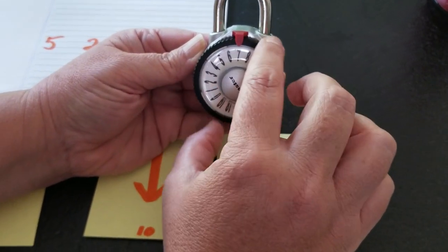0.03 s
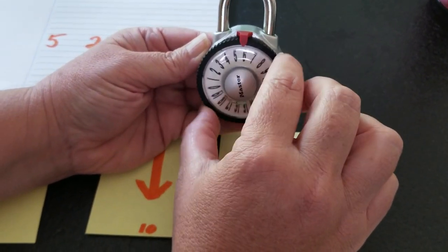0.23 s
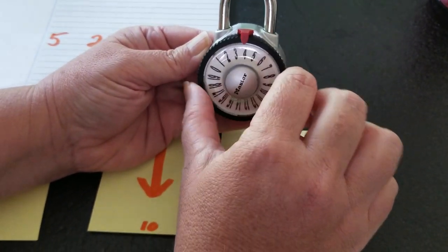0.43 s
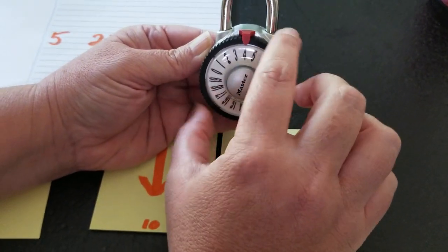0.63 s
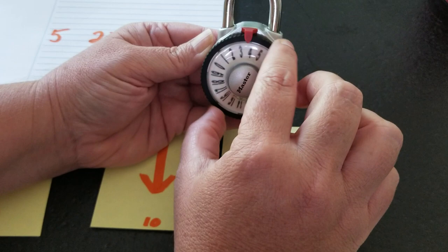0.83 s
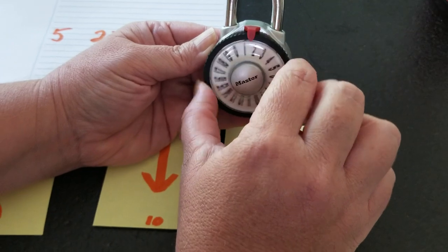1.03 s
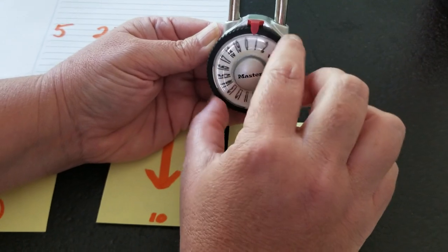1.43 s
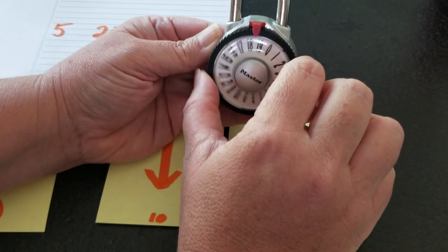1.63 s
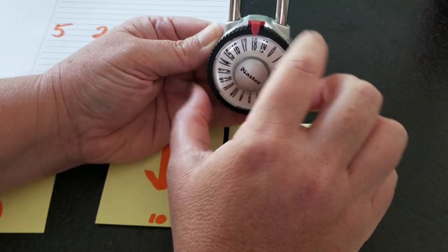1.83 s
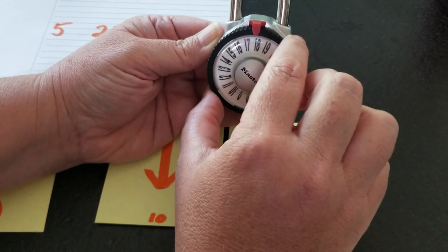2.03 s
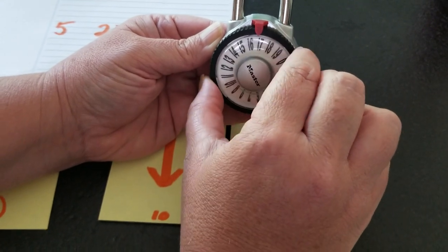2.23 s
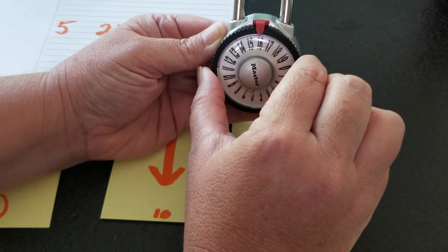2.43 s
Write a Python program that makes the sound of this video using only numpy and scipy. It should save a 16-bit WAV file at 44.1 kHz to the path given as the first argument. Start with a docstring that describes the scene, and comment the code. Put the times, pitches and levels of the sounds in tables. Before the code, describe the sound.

A combination padlock dial clicks close up as a hand turns it. Three sharp metallic clicks fall between 0.2 and 0.45 seconds, then a fingertip slides faintly around 0.7. Three more clicks come from 0.9 to 1.1, followed by faint high rubs near 1.4 and three softer clicks from 1.5 to 1.7. One light click lands at 2.1. Low ventilation hums throughout in the small room.

```python
"""A small live room, with a low ventilation rumble and hum. Close up, a hand turns the dial of a
combination padlock in short pushes. Each click is a few milliseconds of metal parts knocking together
and ringing the case: a faint, very short hiss swells into it, the wheels settle with a duller rebound,
and the room answers. A fingertip slides over the dial for a new grip; later come two faint, high rubs."""
import sys
import numpy as np
from scipy import signal
from scipy.fft import rfft, irfft, next_fast_len
from scipy.io import wavfile
from scipy.ndimage import map_coordinates

SR = 44100
rng = np.random.default_rng(int(sys.argv[2]) if len(sys.argv) > 2 else 0)


def bounce(signal):
    """Save signal as a 16-bit WAV file at the path given by the first command-line argument."""
    frames = np.transpose(np.atleast_2d(signal))
    limited = np.clip(frames, -1, 1)
    pcm = np.round(limited * 32767).astype(np.int16)
    wavfile.write(sys.argv[1], SR, pcm)


N = 110250

# Tone of the ventilation. Each row: frequency in Hz, relative level in dB.
AIR_TONE = [(28, -7.5), (42, 3), (90, -2.5), (150, 2), (200, -1), (260, -5), (320, -5.5), (400, -11.5),
            (600, -12.5), (900, -21.5), (1200, -18.5), (1600, -28.5), (2200, -25.5), (3800, -31.5),
            (5000, -29.5), (9000, -32.5), (15500, -30)]
# Where the air sits. Each row: frequency in Hz, left over right in dB.
AIR_PAN = [(30, 1.8), (120, 2.5), (300, 7.2), (700, 0.33), (8000, 0.33)]
# Narrow bass, wide hiss. Each row: frequency in Hz, left-right correlation.
AIR_CORRELATION = [(30, 0.81), (250, 0.93), (600, 0.37), (1500, 0.1), (8000, 0.033)]
# Level ride on the air. Each row: time in seconds, gain in dB.
AIR_SWELL = [(0, 0.5), (.4, 3), (.8, 4.5), (1.3, 2), (1.7, 3.65), (2.1, 2.5), (2.5, 2)]
# The two hum lines. Each row: frequency in Hz, level in dB before ride and pan.
HUM_LINES = [(119, -69), (317, -71)]
# Level ride on the upper line. Each row: time in seconds, gain in dB.
UPPER_HUM_SWELL = [(0, -12), (.25, -2.5), (.58, -13), (.73, 4.5), (1.03, 6), (1.15, -11), (1.8, -4.5),
                   (2.12, 6.5), (2.22, -9), (2.5, 4)]
# The dial's clicks, plus two faint, high rubs near 1.4 s. Each row: start in seconds, level in dB,
# length in seconds, treble tilt in dB per octave, left over right in dB, relative rebound level in dB.
DIAL_CUES = [(.2255, -20, 0.0014, -1.5, 1.5, -11), (0.3516, -19, .0032, -0.5, 0.5, -21.5),
             (0.4383, -16.5, .0034, -2, -0.5, -25), (0.538, -44.5, 0.0036, -3, 8.5, -49),
             (.7600, -46.5, 0.00087, -3.5, 3.5, -42.5), (0.775, -53, .004, -2, -3.5, -46),
             (0.8869, -18, .0026, -.5, 0.5, -19), (0.976, -20.5, 0.0031, 1, .5, -23.5),
             (1.079, -26, 0.0039, 1.5, 0, -27), (1.386, -65, 0.013, 2, 1, -40),
             (1.425, -60.5, .022, 2, 0, -40), (1.4958, -28, .0048, 1, 1, -24),
             (1.5891, -25.5, 0.0036, 0, 2, -34), (1.6805, -33, 0.0038, -0.3, -1, -28),
             (1.9643, -54.5, 0.0035, 0.5, 4, -38.5), (2.1139, -34.5, .0045, 0, 0, -33),
             (2.3338, -52, 0.0041, -4, -1.5, -34), (2.347, -53, .018, 2.5, 1.5, -38)]
# Modes of the case and wheels. Each row: frequency in Hz, T60 in seconds, left and right weights in dB.
CASE_MODES = [(2446, .012, -13.5, -10), (2600, 0.0035, -5, -11.5), (2876, 0.0098, -28.5, 6.5),
              (4795, 0.024, -2, -4), (4780, 0.0057, 7.5, 7), (5670, 0.0067, -19, -3.5),
              (5340, .006, -16, -17), (7150, 0.0027, 6.5, -16), (7885, 0.0065, 4.5, 0.5),
              (12400, .002, -5, -12), (14730, .002, -3, -22.5)]
# Tone of the bare contact noise. Each row: frequency in Hz, relative level in dB.
CRACK_TONE = [(200, -16), (800, -39.5), (1250, 11.5), (1550, -26.5), (2100, 0.5), (3600, -9.5), (5000, 7.5),
              (8000, -2), (9500, -1.5), (11500, -1), (15500, 3.5)]
# Tone of the settling wheels. Each row: frequency in Hz, relative level in dB.
REBOUND_TONE = [(300, -47), (1200, -14.5), (1600, -24.5), (2050, 1.5), (2450, -0.5), (3200, -12),
                (4000, -20), (15000, -40)]
# Tone of a click's reverb and of its lead-in. Each row: frequency in Hz, relative level in dB.
CLICK_COLOUR = [(200, -26), (600, -25), (1200, -18), (1550, -21.5), (2000, -12.5), (2750, -5), (3050, 0.5),
                (3450, -11.5), (3800, -10), (4350, 3.5), (5150, 0.5), (5900, -10), (6600, -3), (8200, -2.5),
                (9100, -18), (11500, -8.5), (15500, -13)]
# Decay of the room. Each row: frequency in Hz, T60 in seconds.
ROOM_T60 = [(300, 0.42), (1100, 0.77), (2600, 0.35), (4700, 0.39), (7500, 0.32), (11000, .28), (16000, .24)]
# Finger slides. Each row: centre in seconds, half length in seconds, level in dB before flutter.
SLIDES = [(0.736, 0.26, -67)]
# Tone of skin on the dial. Each row: frequency in Hz, relative level in dB.
SKIN_TONE = [(1000, -27.5), (2500, -31), (2800, 6.5), (3250, -0.5), (3500, -7.5), (4700, -7.5),
             (6000, -15.5), (10000, -15), (15000, -26.5)]

CONTACTS, CONTACT_DECAY_S, CONTACT_SCATTER_DB = 7, .0001, 2  # the knocks within one click
CASE_ATTACK_S, RIGHT_LAG_S = .0005, .00016  # the right side is a little farther from the lock
CRACK_T60, CRACK_RISE_DB = .0098, 8  # the crack hardens from first knock to last
FIRM_DB, CRACK_PER_DB, PING_PER_DB = -27.5, .12, .29  # below a firm click: less crack, more ping
PING_HZ, PING_WIDTH_HZ, PING_DB, PING_LENGTH_S = 4670, 260, 3, .0072  # a drawn-out rub hardly pings
ROOM_DB, ROOM_ONSET_S, EARLY_DB, EARLY_T60 = [-7.5, -7], .0049, -11.5, .095
RIPPLE_DB, RIPPLE_HZ = 3, 45.6  # depth and spacing of narrow resonances in the tail
LEVEL_WINDOW_S = .0012  # a click's level is its energy spread over this time


def amp(db):
    """Decibels to gain."""
    return 10 ** (np.asarray(db) / 20)


def unit(x):
    """Scale to rms 1."""
    return x / np.sqrt(np.mean(x ** 2) + 1e-20)


def one_energy(x):
    """Scale to an average energy of 1 per channel."""
    return unit(x) / np.sqrt(x.shape[-1])


def along(points, hz):
    """Read (Hz, value) points on a log axis."""
    f, v = np.transpose(points)
    return np.interp(np.log(hz + 1), np.log(f + 1), v)


def pan(db):
    """Left and right gains for a level difference."""
    return amp(np.array([[.5], [-.5]]) * db)


def fade(t, t60):
    """Exponential decay, 60 dB down at t60."""
    return np.exp(-np.log(1000) * t / t60)


def times(seconds):
    """Sample times of a short sound."""
    return np.arange(int(seconds * SR)) / SR


def wobble(rate):
    """A smooth random curve, rate knots a second."""
    return map_coordinates(rng.standard_normal(int(N * rate / SR) + 4), [np.arange(N) * rate / SR])


def filtered(x, response):
    """Multiply the spectrum by a function of frequency."""
    n = x.shape[-1]
    m = next_fast_len(2 * n)
    return irfft(rfft(x, m) * response(np.fft.rfftfreq(m, 1 / SR)), m)[..., :n]


def eq(x, tone):
    """Shape x with a curve of (Hz, dB) points."""
    return filtered(x, lambda hz: amp(along(tone, hz)))


def tilted(x, tilt_db):
    """Brighten or dull the treble by tilt_db per octave, pivoting at 5 kHz."""
    return filtered(x, lambda hz: amp(tilt_db * np.log2(np.maximum(hz, 2500) / 5000)))


def add(out, s, x):
    """Mix x into out, starting at s seconds."""
    part = out[:, round(s * SR):][:, :x.shape[-1]]
    part += x[:, :part.shape[-1]]


def ventilation(air_db=-64, waver_db=4):
    """The bed: rumbling air with a trace of hiss, and two wavering hum lines."""
    def mid_side(hz):
        width = np.arccos(np.clip(along(AIR_CORRELATION, hz), -1, 1)) / 2
        return (hz > 20) * amp(along(AIR_TONE, hz)) * [np.cos(width), np.sin(width)]

    t = np.arange(N) / SR
    ride = lambda points: amp(np.interp(t, *np.transpose(points)))
    mid, side = filtered(rng.standard_normal((2, N)), mid_side)
    air = unit(filtered(np.array([mid + side, mid - side]), lambda hz: pan(along(AIR_PAN, hz))))
    lines = []
    for hz, db in HUM_LINES:
        waver = amp(waver_db * wobble(5.88))
        phase = 2 * np.pi * hz * t + .4 * wobble(4.6)
        lines.append(amp(db) * unit(waver * np.sin(phase)))
    hum = lines[0] + ride(UPPER_HUM_SWELL) * lines[1]
    return ride(AIR_SWELL) * amp(air_db) * air + pan(db=2.5) * hum


def lead_in(swell_s=.0015):
    """A faint, very short hiss swells into each click."""
    t = times(.012)
    hiss = eq(rng.standard_normal((2, len(t))), CLICK_COLOUR)
    return one_energy(hiss * np.exp((t - t[-1]) / swell_s) * t)


def case_ring(force, t):
    """The knocks set the metal modes of the case and wheels ringing."""
    ring = 0
    for hz, t60, left_db, right_db in CASE_MODES:
        knocks = force * rng.standard_normal(len(t))
        impulse = np.cos(2 * np.pi * hz * t) * fade(t, t60) * -np.expm1(-t / CASE_ATTACK_S)
        mode = signal.fftconvolve(knocks, impulse)[:len(t)]
        ring = ring + amp([[left_db], [right_db]]) * one_energy(mode)
    ring[1] = filtered(ring[1], lambda hz: np.exp(-2j * np.pi * hz * RIGHT_LAG_S))
    return ring


def contact_crack(force, t, length):
    """Metal hitting metal spits a short burst of noise at each knock."""
    snap = force * amp(CRACK_RISE_DB * np.minimum(t / length, 1))
    power = signal.fftconvolve(snap ** 2, fade(t, CRACK_T60) ** 2)[:len(t)]
    return eq(np.sqrt(abs(power)) * rng.standard_normal((2, len(t))), CRACK_TONE)


def bass_cut(x, low_cut_hz=1760):
    """A steep high cut below about 1.8 kHz: the lock sounds only in the treble."""
    return signal.sosfilt(signal.butter(4, low_cut_hz, "high", fs=SR, output="sos"), x)


def click(level_db, length, tilt_db):
    """A quick run of metal contacts that crack and ring the case; drawn out, it makes a rub."""
    t = times(.04)
    slots = (np.arange(CONTACTS) + rng.uniform(-.4, .4, CONTACTS)).clip(0)
    age = t - length * slots[:, None] / (CONTACTS - 1)
    strength = amp(CONTACT_SCATTER_DB * rng.standard_normal((CONTACTS, 1)))
    force = (strength * (age >= 0) * np.exp(-abs(age) / CONTACT_DECAY_S)).sum(0)
    ring = case_ring(force, t)
    crack = contact_crack(force, t, length)
    # a bell boost around the main mode gives the ping
    ping_db = PING_DB + PING_PER_DB * max(FIRM_DB - level_db, 0)
    ping_db *= np.exp(-(length / PING_LENGTH_S) ** 2)
    ring = filtered(ring, lambda hz: amp(ping_db * np.exp(-((hz - PING_HZ) / PING_WIDTH_HZ) ** 2)))
    crack_gain = amp(CRACK_PER_DB * (level_db - FIRM_DB)) * amp([[-5], [-9]])  # left, right
    hit = one_energy(ring) + crack_gain * one_energy(crack)
    return one_energy(bass_cut(tilted(hit, tilt_db)))


def room(tilt_db, ripple):
    """A click's reverb: early scatter off desk and hands, and a tail whose treble dies first."""
    hz, frame_s, spectrum = signal.stft(rng.standard_normal((2, SR * 3 // 4)), SR, nperseg=256)
    tail = signal.istft(spectrum * fade(frame_s, along(ROOM_T60, hz)[:, None]), SR, nperseg=256)[1]
    tail = filtered(tail, lambda f: amp(RIPPLE_DB * map_coordinates(ripple, [f / RIPPLE_HZ], mode="mirror")))
    t = np.arange(tail.shape[1]) / SR
    early = rng.standard_normal(tail.shape) * fade(t, EARLY_T60)
    onset = np.clip(t / ROOM_ONSET_S, 0, 1) ** 2
    coloured = lambda x: one_energy(tilted(eq(x, CLICK_COLOUR), tilt_db) * onset)
    return amp(ROOM_DB)[:, None] * coloured(tail) + amp(EARLY_DB) * coloured(early)


def rebound(t60=.02):
    """The softer, duller knock of the wheels settling."""
    t = times(.04)
    rattle = rng.standard_normal((2, len(t))) * t * fade(t, t60)
    return one_energy(bass_cut(eq(rattle, REBOUND_TONE)))


def dial(lead_db=-26.5, rebound_delay_s=.012):
    """The turning dial: every click or rub layered with its lead-in, rebound and reverb."""
    out = np.zeros((2, N))
    ripple = rng.standard_normal(1024)  # all cues share the same room resonances
    for s, db, length, tilt_db, pan_db, rebound_db in DIAL_CUES:
        direct, hiss = click(db, length, tilt_db), lead_in()
        add(direct, rebound_delay_s, amp(rebound_db) * rebound())
        add(out, s - hiss.shape[1] / SR, amp(db + lead_db) * hiss)
        add(out, s, amp(db) * pan(pan_db) * direct)
        add(out, s, amp(db) * room(tilt_db, ripple))
    return out * np.sqrt(LEVEL_WINDOW_S * SR)


def fingertip(flutter_db=1.52):
    """Skin rubbing lightly on the dial stirs its resonance near 3 kHz."""
    t = np.arange(N) / SR
    stroke = sum(amp(db) * np.exp(-((t - s) / half) ** 2) for s, half, db in SLIDES)
    flutter = amp(flutter_db * wobble(36))
    return stroke * flutter * unit(eq(rng.standard_normal((2, N)), SKIN_TONE))


def scene():
    """The lock up front, over the ventilation bed."""
    return dial() + fingertip() + ventilation()


def record(dry, top_hz=15850):
    """A brick-wall high cut on the mix."""
    return filtered(dry, lambda hz: hz < top_hz)


dry = scene()
out = record(dry)
bounce(out)
```